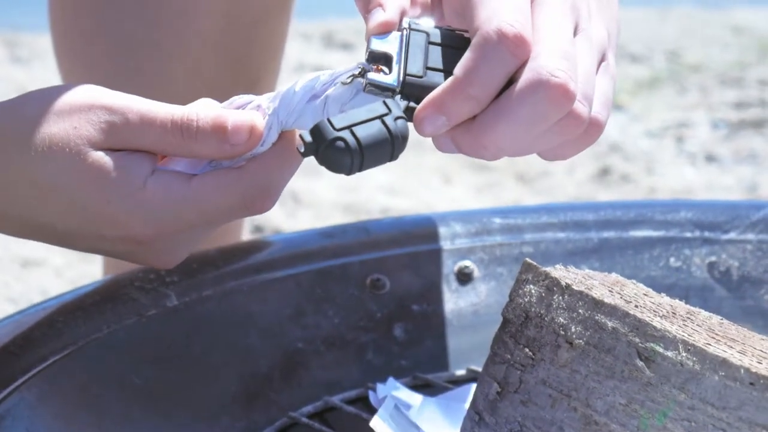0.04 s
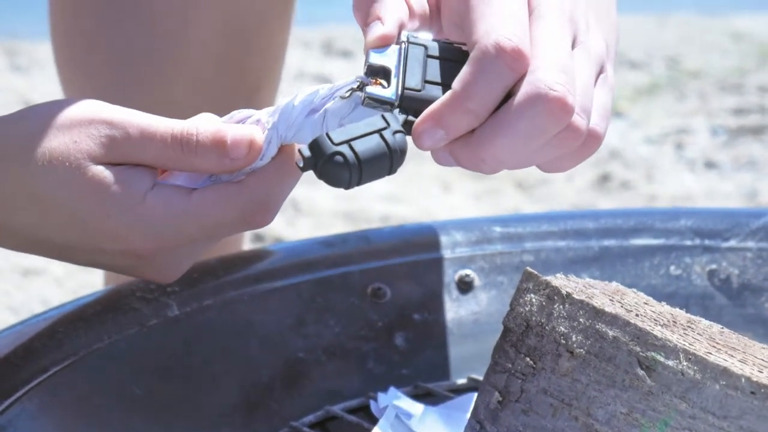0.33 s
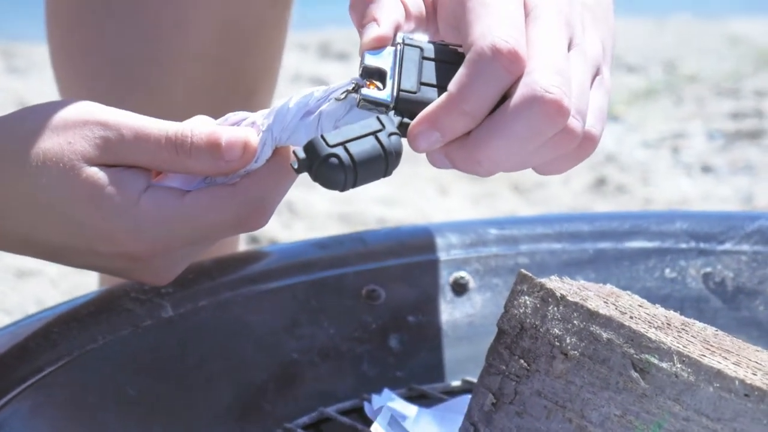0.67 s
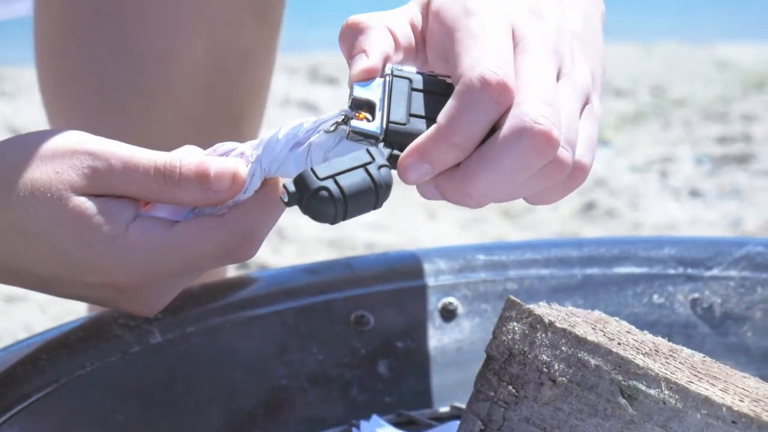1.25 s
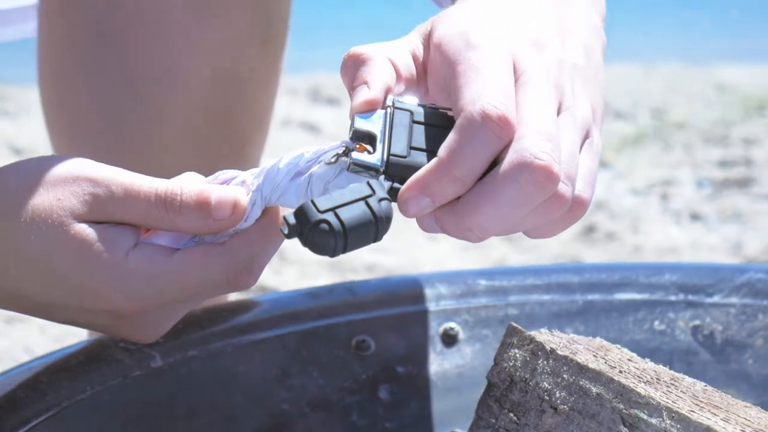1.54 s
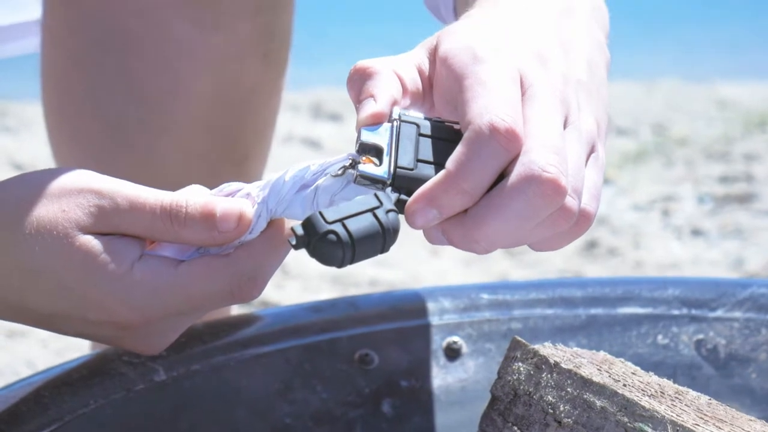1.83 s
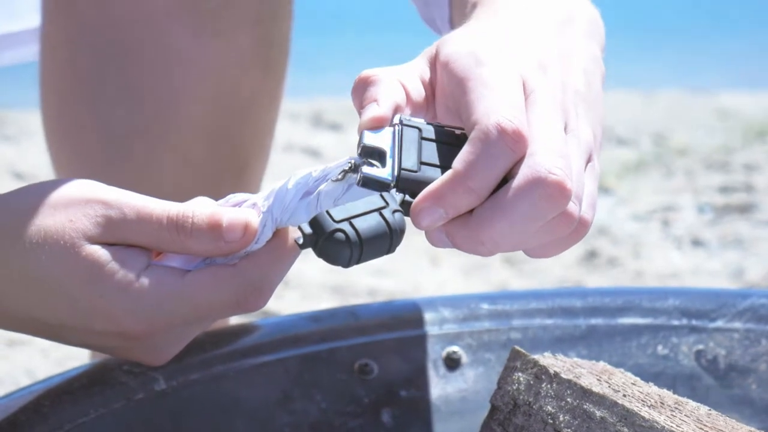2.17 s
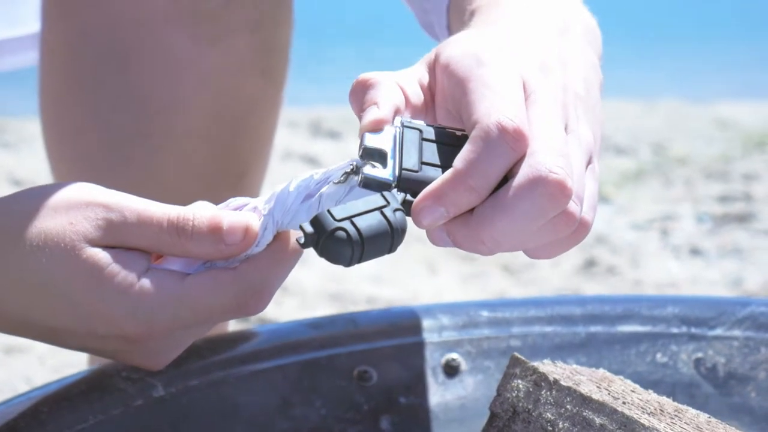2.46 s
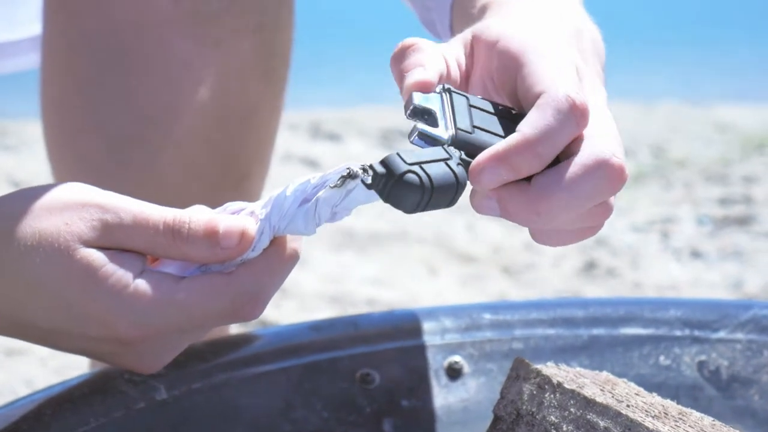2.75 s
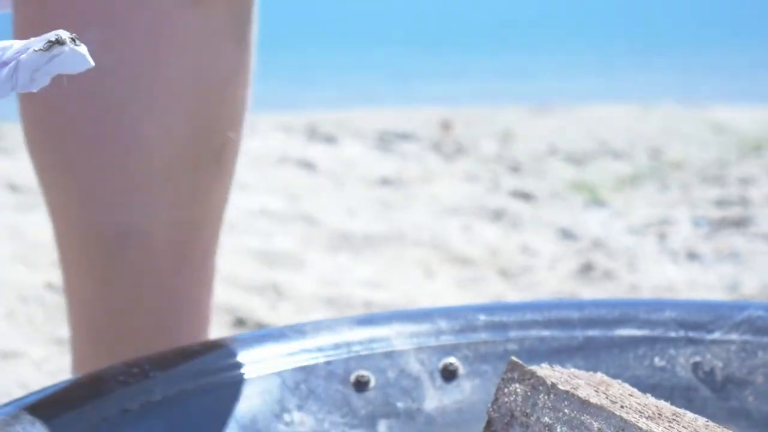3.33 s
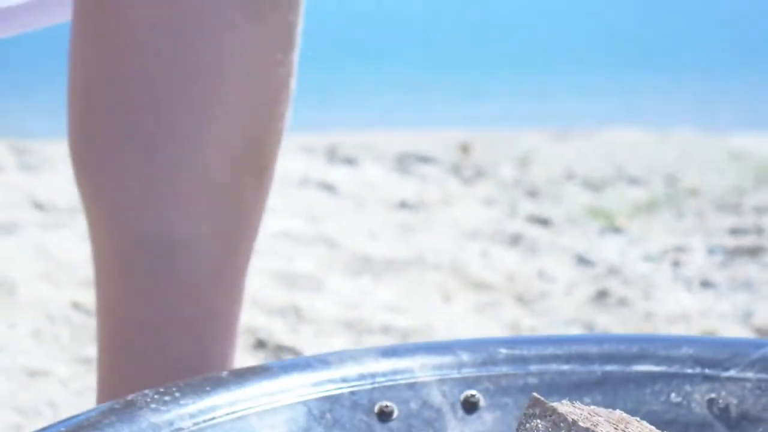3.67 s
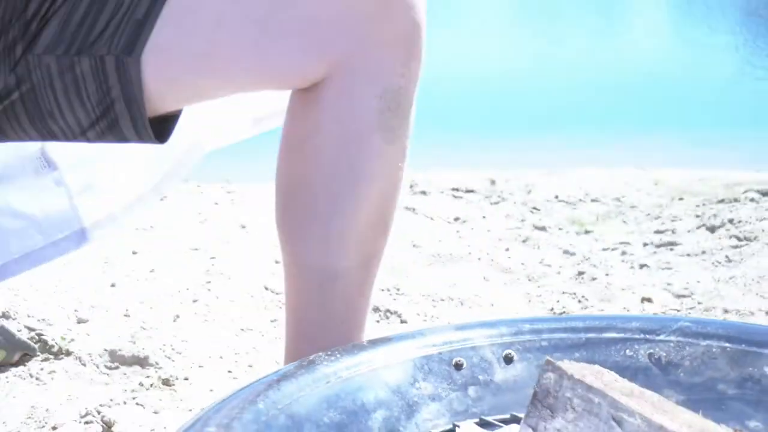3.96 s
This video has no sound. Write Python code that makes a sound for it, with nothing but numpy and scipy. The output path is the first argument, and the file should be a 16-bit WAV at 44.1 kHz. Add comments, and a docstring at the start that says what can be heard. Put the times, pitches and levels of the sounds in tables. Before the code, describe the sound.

Thin hiss of an arc lighter and a short sizzling buzz on a gusty beach.

```python
"""An electric arc lighter hisses against a twist of paper on a beach and snaps off after two seconds.
The hands move away with a rustle, the open lid taps its hinge, and the arc is lit once more in free
air: a short train of sparks, heard as a sizzling buzz. Gusts buffet the microphone; behind them lie
the wash of the shore, the foam of a small wave and a distant engine."""
import sys
import numpy as np
from scipy import signal
from scipy.fft import rfft, irfft
from scipy.io import wavfile
from scipy.ndimage import uniform_filter1d

SR = 44100
rng = np.random.default_rng(int(sys.argv[2]) if len(sys.argv) > 2 else 0)


def store_wav(level_fs):
    """Save 16-bit WAV to argv[1]."""
    pcm = np.round(np.clip(np.atleast_2d(level_fs), -1, 1) * 32767)
    wavfile.write(sys.argv[1], SR, pcm.T.astype(np.int16))


N = 176400
T = np.arange(N) / SR


def amp(db):
    """Decibels to gain."""
    return 10 ** (np.asarray(db) / 20)


def unit(x):
    """Scales to rms 1."""
    return x / np.sqrt(np.mean(x ** 2) + 1e-20)


def curve(rows, column=1):
    """Linear interpolation of a time table."""
    rows = np.array(rows)
    return np.interp(T, rows[:, 0], rows[:, column])


def colour(x, spectrum, resonances=()):
    """Filters by (Hz, dB) points on a log-frequency axis, plus narrow peaks and dips; rms 1."""
    hz = np.fft.rfftfreq(N, 1 / SR)
    points_hz, points_db = np.transpose(spectrum)
    db = np.interp(np.log(hz + 1), np.log(points_hz + 1), points_db)
    db += sum(gain * np.exp(-((hz - centre) / width) ** 2) for centre, width, gain in resonances)
    return unit(irfft(rfft(x) * amp(db), N))


def band(x, centre_hz, octaves):
    """Gaussian band-pass, zero phase."""
    hz = np.fft.rfftfreq(len(x), 1 / SR)
    bell = np.exp(-.5 * (np.log2((hz + 1) / centre_hz) / octaves) ** 2)
    return irfft(rfft(x) * bell, len(x))


def noise():
    """White noise."""
    return rng.standard_normal(N)


def wander(rate_hz):
    """Random motion below about rate_hz; rms 1."""
    hz = np.fft.rfftfreq(N, 1 / SR)
    return unit(irfft(rfft(noise()) * (hz > 0) / (1 + (hz / rate_hz) ** 4), N))


def add(mix, start_s, sound):
    """Mixes a sound in at start_s."""
    part = mix[round(start_s * SR):][:len(sound)]
    part += sound[:len(part)]


def add_burst(mix, start_s, burst, peak_db, centre_hz, octaves):
    """Band-passes a burst and mixes it in, with room for the filter's pre-ring."""
    lead = len(burst) // 2
    sound = band(np.roll(burst, lead), centre_hz, octaves)
    add(mix, start_s - lead / SR, amp(peak_db) * sound / abs(sound).max())


def stereo(source, side_db):
    """Mid and side from two independent runs of a source."""
    return source() + amp(side_db) * np.array([[1], [-1]]) * source()


def arc_hiss():
    """Uneven discharges, too fast to tell apart, swell and dip as the paper meets the arc."""
    # Each row: time in seconds, relative level in dB.
    levels = [(0.0, -55), (0.29, -52), (0.45, -49.5), (0.46, -58.5), (0.65, -49), (0.71, -57), (0.78, -49),
              (0.86, -49), (0.88, -52), (0.93, -48), (1.1, -45.5), (1.15, -58), (1.16, -47), (1.33, -47),
              (1.38, -49), (1.59, -45.5), (1.85, -46), (1.94, -44.5), (2.01, -49.5)]
    # Each row: frequency in Hz, relative density in dB.
    spectrum = [(800, -5.5), (2000, -12), (3500, -7), (5300, -4), (8000, -4.5), (9600, 0.5), (10600, -2.5),
                (11400, 1), (12200, -4), (14500, -1), (15150, -5), (15600, -9.5)]
    # Ringing and hollows of the lighter's head. Each row: centre in Hz, width in Hz, gain in dB.
    resonances = [(2900, 140, 3.5), (4480, 100, -5), (4880, 220, 3), (6230, 85, -15), (7120, 75, -20),
                  (7400, 130, 3), (8000, 200, -5), (8470, 140, 2.5), (8770, 65, -14), (9900, 140, 2),
                  (11420, 140, 2.5), (12750, 80, -7), (13020, 140, 4)]
    off_s, grain_db, flutter_db, trim_db = 2.014, 2, 1, -0.5
    discharges = noise() * amp(grain_db * wander(1800) + flutter_db * wander(28))
    return colour(discharges, spectrum, resonances) * amp(curve(levels) + trim_db) * (T < off_s)


def wind():
    """Eddies push on the microphone; stronger gusts reach higher frequencies."""
    # Each row: time in seconds, relative level in dB.
    levels = [(0.0, -34), (0.04, -33.5), (0.33, -34), (0.36, -39.5), (0.46, -36.5), (0.62, -35),
              (0.8, -38.5), (0.9, -31.5), (1.0, -27), (1.06, -38.5), (1.27, -30.5), (1.39, -38.5),
              (1.44, -26.5), (1.52, -32.5), (1.65, -25), (1.73, -41), (1.88, -39), (1.99, -29), (2.15, -30),
              (2.5, -32.5), (2.59, -32.5), (2.66, -21), (2.81, -32.5), (2.87, -37.5), (3.13, -43.5),
              (3.22, -22), (3.39, -20.5), (3.72, -28.5), (3.88, -30.5), (4.0, -36)]
    # Each row of both: frequency in Hz, relative density in dB.
    lull_spectrum = [(8, 1), (22, 3.5), (40, 3), (65, -8), (100, -15), (160, -31.5), (400, -61),
                     (2000, -110)]
    gust_spectrum = [(8, -11), (22, 14), (40, -3.5), (70, 0.5), (105, -8), (160, -21), (400, -42),
                     (2000, -110)]
    lull_db, gust_db, trim_db = -32.5, -21.5, 1
    level_db, eddies = curve(levels), noise()
    force = np.clip((level_db - lull_db) / (gust_db - lull_db), 0, 1)
    rumble = (1 - force) * colour(eddies, lull_spectrum) + force * colour(eddies, gust_spectrum)
    running_rms = np.sqrt(uniform_filter1d(uniform_filter1d(rumble ** 2, size=3000), size=2000))
    return rumble / running_rms * amp(level_db + trim_db)


def shore():
    """Far water and wind: a soft wash with drifting patches."""
    # Each row: frequency in Hz, relative density in dB.
    spectrum = [(30, -9), (150, 12.5), (300, 4.5), (420, 2.5), (620, 0), (900, -1), (1030, 2.5), (1300, 0),
                (1470, 2.5), (1620, -4.5), (1950, -5.5), (2150, -10), (2550, -9.5), (2850, -9.5),
                (3100, -9), (3500, -7.5), (4200, -14.5), (4600, -16.5), (5400, -15), (6500, -25),
                (8100, -26.5)]
    # Each row: time in seconds, treble gain in dB.
    treble = [(0, 0), (2.45, 1.5), (2.9, -1.5), (3.4, 0.5), (4, 0.5)]
    base_db, patch_db, top_hz = -48, 1.22, 8400
    hz, t, wash = signal.stft(colour(noise(), spectrum), SR, nperseg=1024, noverlap=768)
    patches = uniform_filter1d(rng.standard_normal(wash.shape), size=10, axis=0)
    patches = unit(uniform_filter1d(patches, size=16, axis=1))
    treble_db = np.outer(np.clip(hz / 1500, 0, 1), np.interp(t, *np.transpose(treble)))
    lowpass = 1 / (1 + (hz[:, None] / top_hz) ** 20)
    wash = wash * lowpass * amp(base_db + patch_db * patches + treble_db)
    return signal.istft(wash, SR, nperseg=1024, noverlap=768)[1][:N]


def engine():
    """A far engine at near-steady speed; its lines waver in the moving air."""
    # Each row: multiple of the firing rate, relative level in dB.
    orders = [(2.5, -59), (3, -59), (3.5, -61), (4, -55), (5, -60.5), (6, -62.5), (7, -65)]
    # Each row: frequency in Hz, level in dB.
    whine = [(511, -63), (1023, -68.5)]
    firing_hz, drift, trim_db, waver_db = 60.15, .004, -3.5, 2.5
    clock_s = np.cumsum(1 + drift * wander(4.52)) / SR
    lines = [(order * firing_hz, db + trim_db) for order, db in orders] + whine
    out = np.zeros(N)
    for hz, db in lines:
        waver = amp(waver_db * wander(3.8))
        out += amp(db) * unit(waver * np.sin(2 * np.pi * (hz * clock_s + rng.random())))
    return out


def foam():
    """Foam hisses in a narrow band as a small wave runs up the sand."""
    # Each row: time in seconds, level in dB.
    levels = [(0, -69), (1.6, -71), (2.15, -62), (2.45, -65.5), (2.8, -76), (4, -68)]
    # Each row: frequency in Hz, relative density in dB.
    spectrum = [(1500, -11), (2900, -24), (3500, -4), (4150, -4.5), (4550, -20), (7500, -26), (10000, -52)]
    return colour(noise(), spectrum) * amp(curve(levels))


def buffets():
    """Single eddies each pull, then push on the microphone."""
    # Each row: centre in seconds, relative peak in dB, half length in seconds.
    eddies = [(1.636, -28, .005), (2.024, -20, .004), (2.444, -23, .007), (3.262, -22.5, .0028),
              (3.362, -19.5, .004), (3.487, -23, .0035), (3.571, -25, .003)]
    out = np.zeros(N)
    for centre_s, db, half_s in eddies:
        offset = (T - centre_s) / half_s
        out += amp(db) * offset * np.exp(.5 - .5 * offset ** 2)
    return out


def arc_snaps():
    """A clean crack and a brief sizzle as the arc strikes or breaks."""
    # Each row: start in seconds, peak in dB, centre in Hz, width in octaves.
    snaps = [(2.0145, -23, 7500, 1.9), (3.651, -23, 14000, .7), (3.854, -33, 5500, 1.3)]
    tail_db, tail_s = -8, .007
    out, t = np.zeros(N), np.arange(4096) / SR
    for start_s, peak_db, centre_hz, octaves in snaps:
        tail = rng.standard_normal(len(t)) * np.exp(-t / tail_s)
        crack = (t == 0) + amp(tail_db) * tail / np.linalg.norm(tail)
        add_burst(out, start_s, crack, peak_db, centre_hz, octaves)
    return out


def handling():
    """Dry ticks and soft knocks of handling, and one tiny rising squeak."""
    # Each row: start in seconds, peak in dB, centre in Hz, width in octaves, decay in seconds.
    ticks = [(2.337, -44, 5000, .7, .0015), (2.613, -55, 9500, .3, .002), (3.567, -34, 560, 1.3, .007),
             (3.627, -48, 6000, 1.0, .001), (3.6415, -31.5, 1800, 1.0, .0015)]
    # One row: start and length in seconds, first and last pitch in Hz, peak in dB.
    squeak = (2.301, .013, 5700, 6700, -55)
    out, t = np.zeros(N), np.arange(2048) / SR
    for start_s, peak_db, centre_hz, octaves, decay_s in ticks:
        burst = rng.standard_normal(len(t)) * np.exp(-t / decay_s)
        add_burst(out, start_s, burst, peak_db, centre_hz, octaves)
    start_s, length_s, from_hz, to_hz, peak_db = squeak
    t = np.arange(0, length_s, 1 / SR)
    jitter = .1 * wander(1500)[:len(t)]
    pitch_hz = np.linspace(from_hz, to_hz, len(t)) * (1 + jitter)
    envelope = amp(peak_db) * np.sin(np.pi * t / length_s)
    add(out, start_s, envelope * np.sin(2 * np.pi * np.cumsum(pitch_hz) / SR))
    return out


def paper_scrapes():
    """Soft grainy strokes as the paper slides off the lighter."""
    # Each row: middle and half length in seconds, level in dB, centre in Hz, width in octaves.
    strokes = [(2.34, .012, -68, 12500, .35), (2.559, .009, -68, 11500, .4), (2.59, .035, -74, 10000, .35)]
    grain_db = 2.5
    grains = noise() * amp(grain_db * wander(400))
    out = np.zeros(N)
    for middle_s, half_s, db, centre_hz, octaves in strokes:
        swell = np.exp(-.5 * ((T - middle_s) / half_s) ** 2)
        out += amp(db) * swell * unit(band(grains, centre_hz, octaves))
    return out


def rustle():
    """Fine-grained friction of skin and cloth as the arms move."""
    # Each row: time in seconds, level in dB.
    levels = [(2.98, -74), (3.12, -64.5), (3.22, -57.5), (3.32, -63.5), (3.42, -58), (3.49, -68.5),
              (3.6, -62.5), (3.9, -61.5), (4.0, -69)]
    # Each row: frequency in Hz, relative density in dB.
    spectrum = [(1500, -6), (4500, 0), (7000, -6), (11000, -8), (15000, -13), (15800, -22)]
    grain_db = 1.4
    grains = noise() * amp(grain_db * wander(780))
    return colour(grains, spectrum) * amp(curve(levels))


def lid_taps():
    """The open lid taps its hinge and rings briefly; a longer contact is duller."""
    # Each row: start in seconds, peak in dB, contact time in seconds.
    taps = [(3.008, -37, .00001), (3.030, -46, .0001)]
    # Each row: frequency in Hz, relative level in dB, decay in seconds.
    modes = [(1080, -11, .006), (3010, -9, .002), (4400, -3, .0014), (5650, 0, .0011), (6900, -6, .001),
             (8300, -5, .0012), (10000, -4, .001), (11300, -7, .001)]
    out, t = np.zeros(N), np.arange(2048) / SR
    for start_s, peak_db, contact_s in taps:
        ring = np.zeros(len(t))
        for hz, db, decay_s in modes:
            drive = amp(db) / np.hypot(1, (np.pi * hz * contact_s) ** 2)
            ring += drive * np.exp(-t / decay_s) * np.sin(2 * np.pi * (hz * t + rng.random()))
        add(out, start_s, amp(peak_db) * ring / abs(ring).max())
    return out


def arc_buzz():
    """The free arc breaks and restrikes about 500 times a second; each spark leaves a brief sizzle."""
    # Each row: time in seconds, sparks per second, level in dB.
    burn = [(3.652, 500, -31.5), (3.68, 570, -32), (3.71, 590, -33.5), (3.74, 500, -31.5),
            (3.78, 420, -31.5), (3.81, 660, -33.5), (3.835, 310, -31), (3.855, 370, -32.5)]
    # Each row: frequency in Hz, relative density in dB.
    spectrum = [(600, -8.5), (2000, -14), (3700, -9), (5500, -11.5), (7000, -19), (8600, -18.5),
                (10000, -10.5), (12300, -4), (13700, 3), (15500, 5)]
    jitter, spread_db, sizzle_db, tail_s = .09, 1.2, 0.5, 0.0023
    lit = (T >= burn[0][0]) & (T < burn[-1][0])
    cycles = np.cumsum(curve(burn) * (1 + jitter * wander(300))) / SR
    sparks = np.diff(np.floor(cycles), prepend=0) * lit * amp(spread_db * noise())
    sizzle = signal.lfilter([1], [1, -np.exp(-1 / (tail_s * SR))], sparks) * noise()
    buzz = colour(unit(sparks) + amp(sizzle_db) * unit(sizzle), spectrum)
    buzz *= np.sqrt(lit.mean())  # rms 1 while lit
    return buzz * amp(curve(burn, column=2))


def scatter(x):
    """Adds faint reflections off the hands and a steel fire ring, different in each ear."""
    level_db, decay_s = -18.5, 0.01
    t = np.arange(3000) / SR
    tails = rng.standard_normal((2, len(t))) * np.exp(-t / decay_s)
    tails /= np.linalg.norm(tails, axis=1, keepdims=True)
    return x + amp(level_db) * signal.fftconvolve(x[None], tails, axes=1)[:, :N]


def scene():
    """The lighter close by, the beach around it."""
    near = stereo(arc_hiss, side_db=-16) + stereo(rustle, side_db=-15)
    near += scatter(arc_buzz() + arc_snaps() + handling() + paper_scrapes() + lid_taps())
    beach = stereo(shore, side_db=-37.5) + foam() + engine()
    return near + beach + wind() + 2 * buffets()


def record(dry):
    """Each microphone's own hiss, then the recorder's band limit."""
    # Each row: frequency in Hz, relative density in dB.
    hiss_spectrum = [(300, 8), (4000, 9), (7000, 4), (9000, 0), (15000, -1), (15800, -10)]
    hiss_db, cutoff_hz = -70.5, 15780
    hiss = amp(hiss_db) * np.array([colour(noise(), hiss_spectrum) for _ in dry])
    lowpass = signal.firwin(511, cutoff_hz, window=("kaiser", 9), fs=SR)
    return signal.oaconvolve(dry + hiss, lowpass[None], "same")


dry = scene()
out = record(dry)
store_wav(out)
```